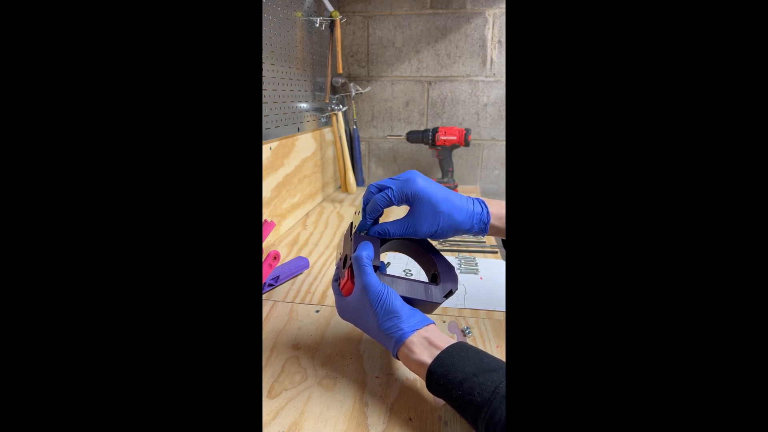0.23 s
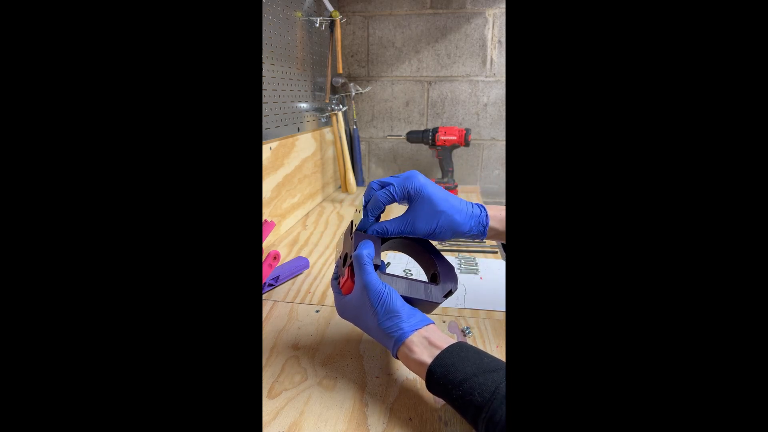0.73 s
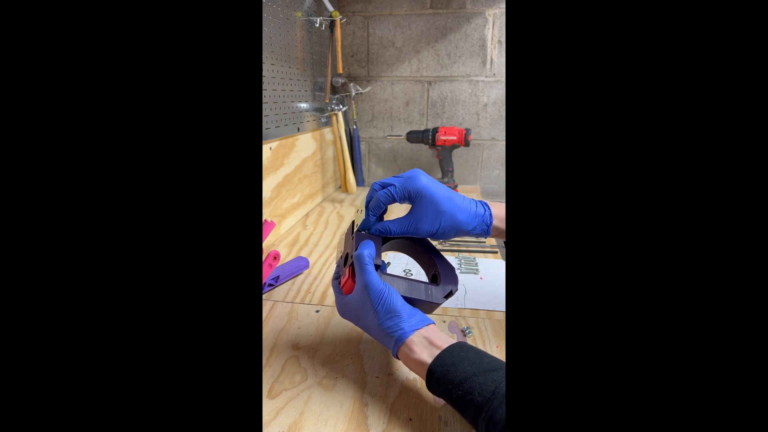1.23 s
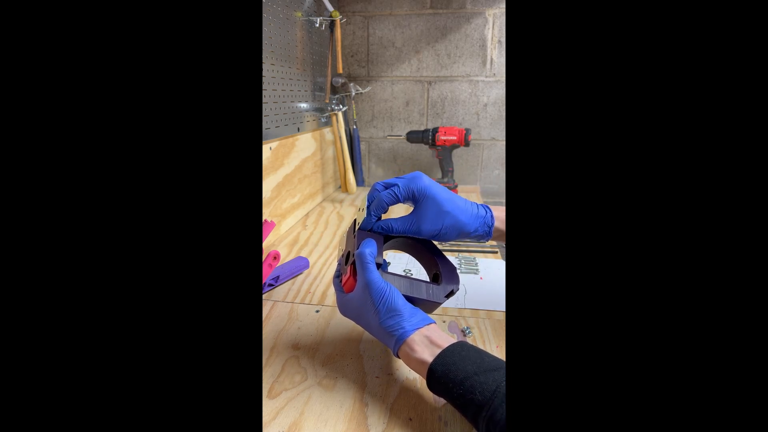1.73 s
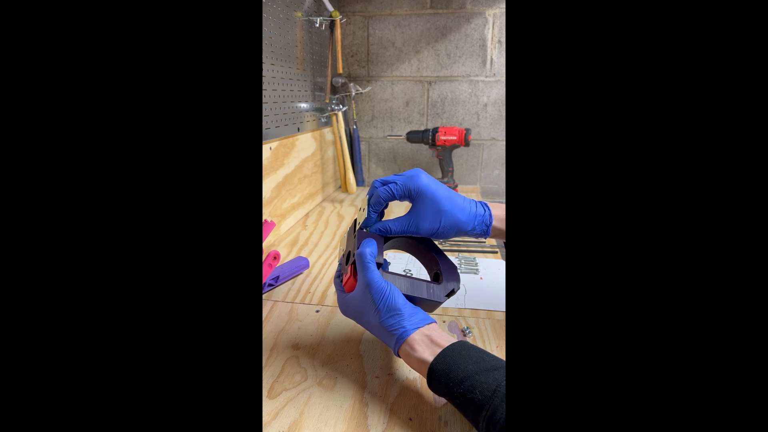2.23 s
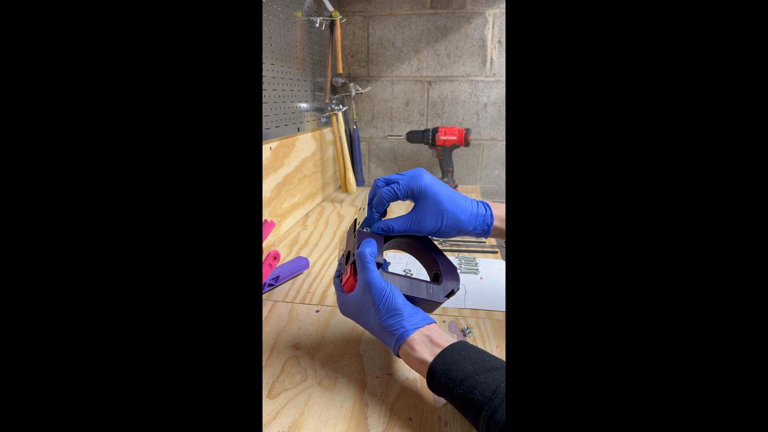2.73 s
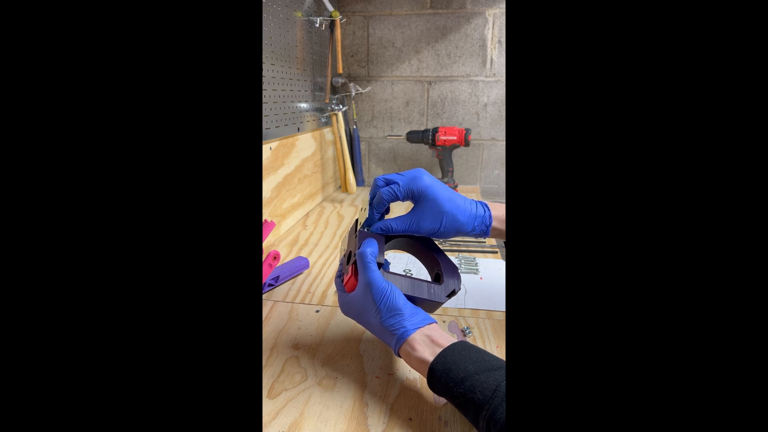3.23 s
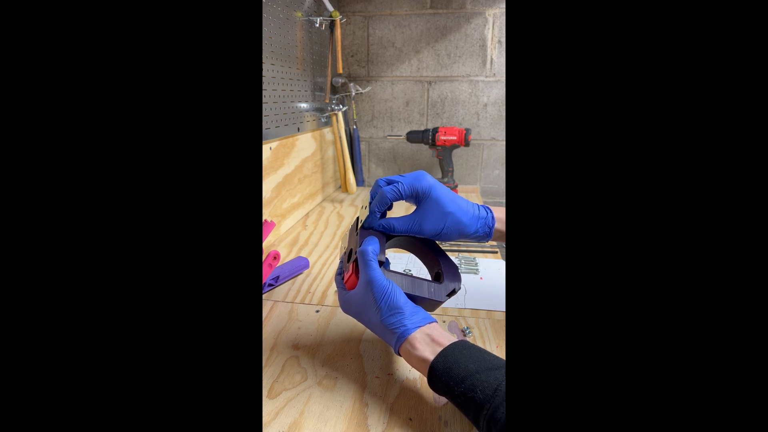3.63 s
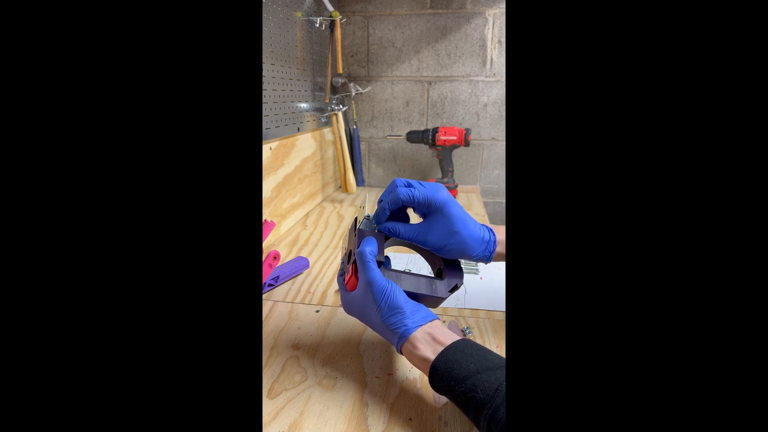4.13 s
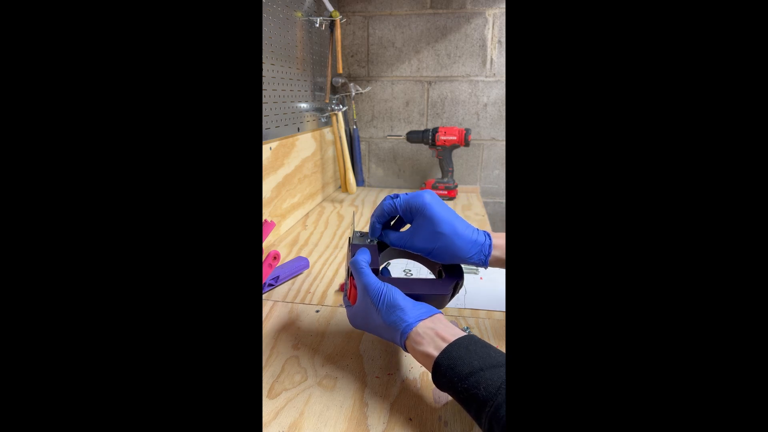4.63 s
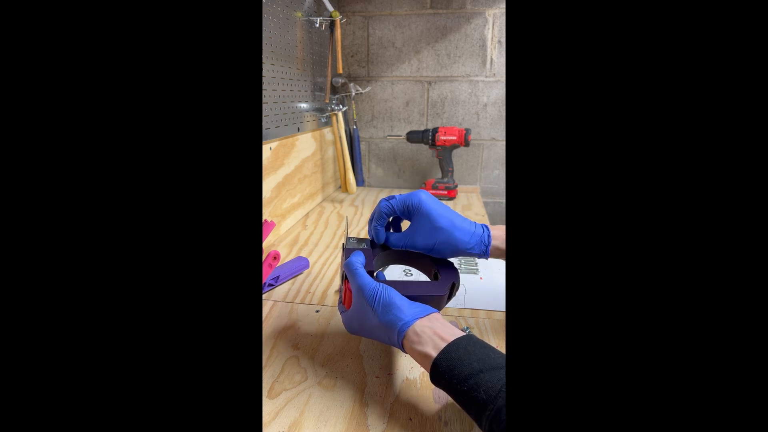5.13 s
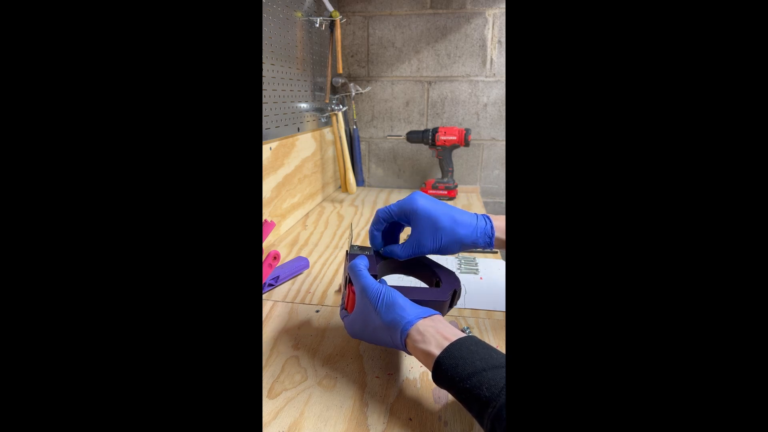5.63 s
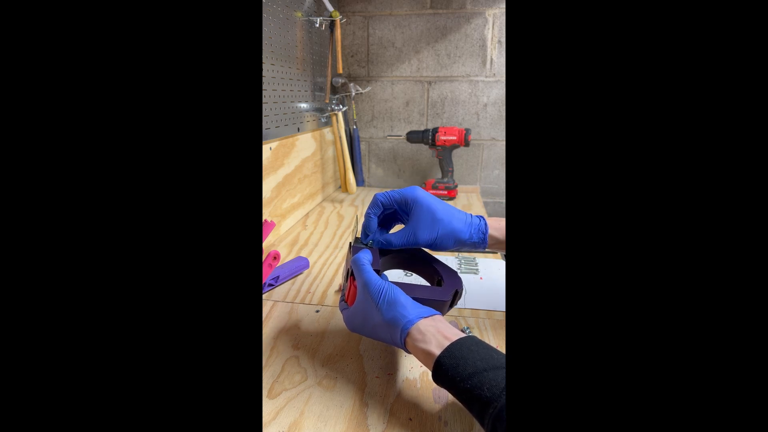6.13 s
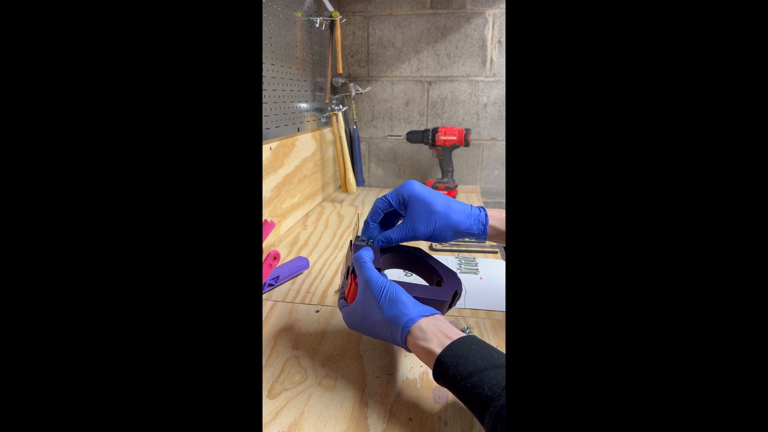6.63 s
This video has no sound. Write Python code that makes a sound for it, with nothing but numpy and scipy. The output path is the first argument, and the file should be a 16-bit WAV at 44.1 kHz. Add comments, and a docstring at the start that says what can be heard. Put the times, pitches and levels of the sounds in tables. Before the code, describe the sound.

Small steel nuts tick, scrape and clink as gloved fingers thread them onto a bracket's bolts, over a steady workshop fan hum.

```python
"""Over the steady hum and whine of a workshop fan, small steel nuts tick onto the bolts of a bracket.
Gloved fingers turn them in short strokes: they catch in the thread, grind and now and then clink hard,
each touch a burst of tiny impacts that rings the steel while the fingers damp it.
The rubber gloves stick and slip, which gives a rub, a rasp and one faint squeak.
The wooden workbench and the room add short echoes."""
import sys
import numpy as np
from scipy import signal
from scipy.fft import rfft, irfft
from scipy.io import wavfile

SR = 44100
rng = np.random.default_rng(int(sys.argv[2]) if len(sys.argv) > 2 else 0)


def unload_wav(signal):
    """Save mono or channel-first audio to the path in sys.argv[1] as 16-bit WAV at rate SR, clipped to [-1, 1]."""
    wavfile.write(
        sys.argv[1],
        SR,
        np.round(np.clip(np.atleast_2d(signal).T, -1, 1) * 32767).astype(np.int16),
    )


N = 303095
TIME = np.arange(N) / SR
HZ = np.fft.rfftfreq(N, 1 / SR)
SIDES = np.array([[1], [-1]])   # left, right

# a nut catches in the thread and drops free; body and edge lift its low and high register:
# (time [s], relative level [dB], body [dB], edge [dB], favoured pitch [Hz])
CATCHES = [(0.2236, -36, -6.5, -4, 9550), (0.23, -42, -3, 4, 7200), (0.2864, -45.5, -3.5, -4, 6500),
           (0.469, -45.5, -5, -9, 7100), (0.525, -52, -8, 7, 6340), (0.569, -41.5, 2.5, -21, 2200),
           (0.7874, -41, -5, -4, 7300), (0.9437, -40, -2.5, -12, 7150), (1.0297, -59.5, 9, 3, 6000),
           (1.168, -31, -11.5, -0.5, 6600), (1.22, -48, -3, -1, 7100), (1.3205, -43, -7, -8, 7500),
           (1.3437, -39.5, 3.5, -1, 7100), (1.5265, -55, 4, 1, 8300), (1.7332, -50.5, 1, -9, 7400),
           (1.78, -53.5, -12, -1, 7540), (2.387, -52, 5, -1, 7700), (2.4263, -26, -6.5, -7, 1920),
           (2.434, -33, -29, -17, 7160), (2.622, -42, -18, -6, 7100), (2.8988, -28.5, -6, -8, 2520),
           (3.1912, -42, 1, -8, 6900), (3.357, -37, 3, -4, 6850), (3.3611, -38, 0.5, 4, 14100),
           (3.717, -43.5, 6.5, -7, 7860), (3.78, -52, -7, -5, 7000), (3.909, -39, 5.5, -6, 5640),
           (3.9205, -50, 3, -5, 8300), (3.95, -43, 4, -7, 4260), (4.0411, -44, -10, -13, 8300),
           (4.1755, -47.5, -13, -6, 7800), (4.1868, -50, 8, -6, 4300), (4.2057, -52, 2, -7, 4850),
           (4.2401, -50, 5, -9, 4300), (4.2554, -49, -11, -2, 8300), (4.298, -59, 0, -7, 4800),
           (4.359, -50, -10, -16, 8400), (4.368, -46.5, -7, -12, 8350), (4.4048, -45, -8, -2, 8350),
           (4.4895, -59, 0, -1, 9100), (4.5773, -56.5, 5.5, 4, 9600), (5.1062, -43.5, 3, 0, 7320),
           (5.4136, -62, 18, -4, 2200), (5.714, -59.5, 5, 5, 8300), (6.009, -56.5, 15, 7, 3450),
           (6.184, -36, -4.5, 1.5, 7550), (6.192, -47, -10, 7, 12900), (6.2175, -50, -9, -9, 7940),
           (6.8377, -51, -16, -10, 6700)]
# loose steel parts knock together, with a relative level for each register:
# (time [s], low [dB], middle [dB], high [dB], chatter [s], favoured pitch [Hz])
KNOCKS = [(3.4802, -37.5, -20.5, -21, 0.0012, 8350), (3.4865, -30.5, -23, -22, 0.0051, 8350),
          (3.4962, -41.5, -20.5, -24, 0.0012, 7000), (3.4985, -43, -21, -24, 0.0033, 12350),
          (3.5065, -47, -33, -33, 0.002, 12350), (4.6939, -34, -25.5, -20.5, 0.0016, 12350),
          (4.7168, -33, -23.5, -20, 0.0015, 12350), (4.7475, -36.5, -25.5, -17.5, 0.00096, 12350),
          (4.7505, -38.5, -34.5, -17.5, 0.0014, 13960), (4.7674, -46.5, -47.5, -37, 0.00091, 13960),
          (5.1317, -45, -30, -29, 0.0022, 7800), (5.1484, -54, -29.5, -42, 0.0018, 7900)]
# dry stretches of thread: (time [s], low [dB], middle [dB], high [dB], length [s], favoured pitch [Hz])
DRY_SPOTS = [(1.53, -53.5, -56, -49, 0.0095, 8300), (2.054, -65, -56, -71, 0.0091, 7700),
             (2.245, -58, -57, -73, 0.0091, 7200), (3.276, -51.5, -54, -67, 0.014, 4360),
             (3.341, -45, -57, -53, 0.0085, 4350), (3.467, -49, -43, -43, 0.012, 7800),
             (3.623, -56, -61, -68, 0.0052, 4800), (3.951, -49, -47, -54, 0.014, 4520),
             (3.983, -55, -52, -58, 0.008, 7800), (4.036, -51, -46.5, -59, 0.014, 8300),
             (4.181, -46.5, -56, -57, 0.0066, 4260), (4.213, -53, -55, -60, 0.0059, 4850),
             (4.22, -48, -59, -62, 0.0088, 4300), (4.233, -49.5, -52, -57, 0.0091, 4400),
             (4.363, -59, -55, -65, 0.0114, 8350), (4.381, -53, -54, -62, 0.0055, 4850),
             (4.409, -55, -49, -53, 0.017, 8400), (5.359, -66, -61, -61, 0.012, 8300),
             (6.005, -48, -57, -54, 0.007, 4750)]
# the ring of bracket, bolt and nut: (pitch [Hz], undamped width [Hz], relative level [dB])
STEEL_MODES = [(2193, 20, -2), (2890, 1200, -3.5), (3495, 210, -1), (4254, 260, 0.5), (4800, 95, -4),
               (5250, 340, 1), (6430, 82, 0), (7140, 120, 3), (7800, 240, 2), (8350, 110, 0.5),
               (9070, 110, 2), (9700, 210, -2.5), (11200, 560, -4.5), (12510, 41, -0.5), (12900, 70, -4.5),
               (13850, 110, -1), (15530, 130, -0.5)]
# fingertip strokes on the nut: (centre time [s], half length [s], pressure [dB], brightness [dB])
STROKES = [(0.254, 0.029, -59, 8), (0.547, 0.041, -53.5, 12), (0.652, 0.014, -55, 8), (0.97, 0.061, -67, 8),
           (1.284, 0.12, -63.5, -6), (1.525, 0.03, -52.5, 8), (1.802, 0.026, -62, 8),
           (1.928, 0.025, -65, -4), (2.063, 0.031, -61, -3), (2.224, 0.038, -64.5, 13),
           (2.466, 0.044, -49.5, 8), (2.639, 0.036, -56, -4), (2.75, 0.02, -55, -2),
           (2.96, 0.047, -56.5, 4), (3.182, 0.0084, -53, -7), (3.265, 0.013, -63, -12),
           (3.403, 0.085, -51.5, 1.5), (3.61, 0.14, -62.5, 2.5), (3.956, 0.034, -48, 7),
           (4.057, 0.03, -54, 10), (4.22, 0.085, -60.5, 12), (4.414, 0.05, -52, 10),
           (4.657, 0.027, -54, 3.5), (5.055, 0.023, -49, 8), (5.118, 0.061, -46, -1),
           (5.398, 0.034, -59, 17), (5.576, 0.019, -58.5, 7), (5.684, 0.077, -58, 0.5),
           (5.952, 0.11, -66.5, -2), (6.196, 0.04, -58, -3), (6.362, 0.028, -61.5, 8),
           (6.658, 0.024, -60, 4.5), (6.723, 0.03, -66, 7)]
# the hand slides on the bracket: (centre time [s], half length [s], low rustle [dB], dull rub [dB])
GRIP_SHIFTS = [(4.137, 0.12, -51, -60), (4.845, 0.17, -56, -52), (5.676, 0.29, -52, -65.5),
               (6.696, 0.072, -76.5, -67.5), (6.858, 0.061, -54, -57)]
# the dull and the bright side of glove friction: (frequency [Hz], relative level [dB])
RUB_SPECTRUM = [(1500, -1.5), (2150, 15), (2900, 3), (3500, 7), (4400, 9.5), (5400, 5.5), (7000, -5),
                (10000, -7)]
RASP_SPECTRUM = [(3500, -7), (5800, -3), (8200, 1), (10500, -1), (12800, -0.5), (14200, -6), (15500, -18),
                 (16500, -40.5)]
# the path of a glove's squeak: (time [s], pitch [Hz], level [dB])
SQUEAK_PATH = [(5.75, 4700, -85), (5.79, 4830, -65), (5.83, 5020, -70), (5.87, 4800, -65),
               (5.905, 4750, -80), (5.95, 4800, -63), (6.0, 4620, -76)]
# the fan's rush of air: (frequency [Hz], relative level [dB])
AIR_SPECTRUM = [(170, -8.5), (270, -12.5), (350, -8), (520, -11.5), (740, -9), (950, 2), (1150, 0.5),
                (1560, -5.5), (1820, -20), (2200, -18.5), (3200, -32.5), (5000, -35.5), (13000, -49.5),
                (16000, -70)]
# how alike that rush is on both sides: (frequency [Hz], correlation [-1 to 1])
AIR_LIKENESS = [(100, 0.82), (200, 0.6), (320, 0.58), (550, 0.13), (750, 0.73), (950, 0.71), (1700, 1),
                (2300, 0.12), (4000, 0.15), (6000, 1), (16000, 0.7)]
# low room modes that the fan stirs: (pitch [Hz], width [Hz], level [dB])
ROOM_MODES = [(55.4, 13, -50), (76.9, 7.9, -42), (107, 5.9, -45), (118.4, 8.2, -57.5), (135.9, 1.8, -50.5),
              (150.8, 9.1, -56.5), (225, 18, -62.5)]
# motor hum and fan whine: (pitch [Hz], level [dB], left minus right [dB], left lead [s], waver [dB])
FAN_TONES = [(59.6, -37.5, 0, 0, 1.87), (120.4, -44.5, 2.5, 0, 0.7), (600, -64.5, 6.5, -.00035, 4.5),
             (821, -43, -10.5, -.000495, 0.7), (838, -59.5, 0.5, -.0004, -1)]
# how far the left side is ahead of the right: (frequency [Hz], phase lead [rad])
LEFT_LEAD = [(0, 0), (860, -1), (1400, -0.5), (1980, 0.3), (2750, 2.5), (3800, 1.97), (4950, 1.57),
             (6000, 3), (7800, 6.5), (12000, 11.5), (13000, 13), (15400, 16.5)]


def ticks(faint_per_stroke=2, chatter_s=0.0021):
    """The nut catches and drops free: clear ticks, plus faint ones that follow each stroke's pressure."""
    rows = [(s, db + body, db, db + edge, chatter_s, hz) for s, db, body, edge, hz in CATCHES]
    for centre, half, pressure_db, _ in STROKES:
        for moment, force, place in rng.standard_normal((faint_per_stroke, 3)):
            s = centre + half * np.tanh(moment)
            db = pressure_db - 5.5 + 5.5 * force
            favoured_hz = 7800 + 1000 * place
            rows.append((s, db + 0.5, db, db - 7.5, chatter_s, favoured_hz))
    return from_db(-2) * contacts(rows, damping=0.021, crack_db=11, first_blow=2.6, detune=0.016)


def clinks():
    """Loose steel parts knock hard together and ring longer than a tick."""
    return from_db(-4) * contacts(KNOCKS, damping=0.011, crack_db=10.5, first_blow=3.8, detune=0)


def contacts(rows, damping, crack_db, first_blow, detune, size=4096):
    """Steel on steel: a first blow and a dying burst of micro-impacts crack and set the modes ringing."""
    t, out = np.arange(size) / SR, np.zeros(N + size)
    for s, *levels_db, chatter_s, favoured_hz in rows:
        tuning = np.exp(detune * rng.standard_normal())   # the modes shift as the nut moves on the bolt
        impacts = crackle(9000, size) * np.exp(-(t / (2 * chatter_s)) ** 2)
        impacts[0] += first_blow
        sound = from_db(crack_db) * impacts
        for hz, width, db in STEEL_MODES:
            gain = from_db(db + contact_lift(hz, favoured_hz) + 2 * rng.standard_normal())
            held_width = width + damping * hz   # the fingers cut the ring short
            sound += gain * rng.choice([-1, 1]) * resonate(impacts, hz * tuning, held_width)
        at = round(s * SR)
        out[at:at + size] += balance_registers(sound, levels_db, attack_s=0.008)
    return out[:N]


def scrapes(grains_per_s=520, finger_damping_hz=160, size=2048):
    """A dry thread grinds: a short swell of uneven grains rings the pinched steel."""
    t, out = np.arange(size) / SR, np.zeros(N + size)
    for s, *levels_db, length, favoured_hz in DRY_SPOTS:
        swell = (t / length) ** 0.5 * np.exp(-(t / length) ** 2)
        grains = crackle(grains_per_s, size) * swell
        sound = np.zeros(size)
        for hz, width, db in STEEL_MODES:
            gain = from_db(db + contact_lift(hz, favoured_hz))
            sound += gain * rng.choice([-1, 1]) * resonate(grains, hz, width + finger_damping_hz)
        at = round(s * SR)
        out[at:at + size] += balance_registers(sound, levels_db, attack_s=length)
    return out[:N]


def resonate(x, hz, width):
    """One ringing mode; it takes the same energy from a click whatever its width."""
    r = np.exp(-np.pi * width / SR)
    feedback = [1, -2 * r * np.cos(2 * np.pi * hz / SR), r * r]
    return signal.lfilter(np.sqrt(1 - r * r) * np.array([1, 0, -1]), feedback, x)


def contact_lift(hz, favoured_hz, lift_db=11, reach_hz=400):
    """The point of contact brings out the modes near one pitch: their lift in dB."""
    return lift_db * np.exp(-((hz - favoured_hz) / reach_hz) ** 2)


def balance_registers(sound, levels_db, attack_s, edges_hz=(1400, 5500, 10500, 17500)):
    """How firm and how sharp a touch is sets the loudness of its low, middle and high register."""
    out, attack = 0, np.arange(len(sound)) / SR < attack_s
    for low, high, db in zip(edges_hz, edges_hz[1:], levels_db):
        register = band(band(sound, low, high), low, high)
        power = max(np.mean(register[attack] ** 2), np.mean(register ** 2))
        out += from_db(db) * register / np.sqrt(power + 1e-20)
    return out


def gloves(rub_db=-2.5, rasp_db=-5.5):
    """Rubber drags on steel: each stroke has a dull rub and a bright rasp, a sliding hand only the rub."""
    dull = [(s, half, db + rub_db - bright / 2) for s, half, db, bright in STROKES]
    dull += [(s, half, db) for s, half, _, db in GRIP_SHIFTS]
    sharp = [(s, half, db + rasp_db + bright / 2) for s, half, db, bright in STROKES]
    rub = swells(dull) * friction(RUB_SPECTRUM, slips_per_s=900, clump_db=3, grit_db=-5.5)
    rasp = swells(sharp) * friction(RASP_SPECTRUM, slips_per_s=2400, clump_db=3.5, grit_db=-9.5)
    return rub + rasp


def friction(spectrum, slips_per_s, clump_db, grit_db):
    """Rubber sticks and slips: dense tiny snaps in clumps, with sparser scratches of the thread."""
    slips = crackle(slips_per_s) * from_db(clump_db * drift(65))
    scratches = crackle(per_s=150)
    texture = rms_one(slips) + from_db(grit_db) * rms_one(scratches)
    return coloured(texture, from_db(curve(spectrum)))


def squeak(waver_hz=24.8, roughness_hz=80):
    """A slipping fingertip sings one thin, wavering line."""
    s, hz, db = np.transpose(SQUEAK_PATH)
    pitch = np.interp(TIME, s, hz) + waver_hz * drift(14.3) + roughness_hz * drift(380)
    gain = np.interp(TIME, s, from_db(db), left=0, right=0) * from_db(2.8 * drift(30))
    return np.sqrt(2) * gain * np.sin(2 * np.pi * np.cumsum(pitch) / SR)


def grip():
    """The hand moves on the bracket with a soft, low rustle."""
    rustle = rms_one(band(rng.standard_normal((2, N)), 210, 460))
    return swells([(s, half, db) for s, half, db, _ in GRIP_SHIFTS]) * rustle


def reflections(x, t60_s, build_s, width, size=16384):
    """Nearby surfaces return a dying cloud of echoes, widest in the midrange."""
    t = np.arange(size) / SR
    cloud = rng.standard_normal((2, size))
    top = irfft(rfft(cloud) * (np.fft.rfftfreq(size, 1 / SR) > 10000), size)
    fade = from_db(-60 * t / t60_s)
    onset = 1 - np.exp(-(t / build_s) ** 2)
    mid, side = ((cloud - top) * fade + top * fade ** 0.94) * onset   # the top lingers slightly
    side = 0.7 * band(side, 500, 4500) + 0.3 * side
    echoes = (mid + width * side * SIDES) / np.sqrt(np.sum(mid ** 2))
    return signal.fftconvolve(x[None], echoes, axes=1)[:, :N]


def fan():
    """The ventilation fan lays the bed: rushing air, rumble in the room modes, motor hum, thin whine."""
    alike = np.clip(curve(AIR_LIKENESS), -1, 1)
    mid, side = rfft(rng.standard_normal((2, N)))
    air = irfft(np.sqrt(1 + alike) * mid + np.sqrt(1 - alike) * side * SIDES, N)
    out = from_db(-41.5) * coloured(phase_spread(air), from_db(curve(AIR_SPECTRUM)))
    for hz, width, db in ROOM_MODES:
        out += from_db(db) * coloured(rng.standard_normal(N), 1 / (1 + ((HZ - hz) / width) ** 2))
    for hz, db, pan_db, lead_s, waver_db in FAN_TONES:
        phase = 2 * np.pi * (hz * (TIME + SIDES * lead_s / 2) + rng.random()) + 0.1 * drift(1.5)
        gain = from_db(db + SIDES * pan_db / 2 + waver_db * drift(7.8))
        out += np.sqrt(2) * gain * np.sin(phase)
    return out


def phase_spread(pair):
    """Each pitch reaches left and right with its own phase difference."""
    lead = np.interp(HZ, *np.transpose(LEFT_LEAD))
    return irfft(rfft(pair) * np.exp(0.5j * lead * SIDES), N)


def crackle(per_s, size=N):
    """Clicks at random moments and of random strength."""
    return rng.standard_normal(size) * (rng.random(size) < per_s / SR)


def swells(rows):
    """Bell-shaped envelopes, added in power: (centre time [s], half length [s], level [dB])."""
    powers = (from_db(db) ** 2 * np.exp(-np.minimum(((TIME - s) / half) ** 2, 100))
              for s, half, db in rows)
    return np.sqrt(sum(powers))


def drift(rate_hz):
    """A smooth random wobble at rms 1."""
    return coloured(rng.standard_normal(N), 1 / (1 + (HZ / rate_hz) ** 2))


def band(x, low_hz, high_hz):
    """A gentle band-pass."""
    return signal.sosfilt(signal.butter(2, [low_hz, high_hz], "band", fs=SR, output="sos"), x)


def coloured(x, gain):
    """Equalised by a gain per frequency, at rms 1."""
    return rms_one(irfft(rfft(x) * gain, N))


def curve(points):
    """A spectrum table read at every frequency, on a log axis."""
    hz, value = np.transpose(points)
    return np.interp(np.log(HZ + 1), np.log(hz), value)


def rms_one(x):
    """Scaled to rms 1."""
    return x / np.sqrt(np.mean(x ** 2) + 1e-20)


def from_db(db):
    """Decibels as a gain."""
    return 10 ** (np.asarray(db) / 20)


def scene():
    """Nuts and gloves up close, with echoes from bench and room, over the fan."""
    close = clinks() + ticks() + scrapes() + gloves() + squeak()
    bench = from_db(-8) * reflections(close, t60_s=0.06, build_s=0.002, width=1)
    # the walls swallow the highest treble
    dulled = signal.sosfilt(signal.butter(1, 10000, fs=SR, output="sos"), close)
    room = from_db(-6.5) * reflections(dulled, t60_s=0.16, build_s=0.0012, width=1.4)
    return phase_spread(close + bench + room) + grip() + fan()


def record(dry):
    """The deepest bass is rolled off and the top is cut steeply."""
    thinned = signal.sosfilt(signal.butter(2, 28, "high", fs=SR, output="sos"), dry)
    return signal.sosfilt(signal.ellip(10, 0.2, 80, 16050, fs=SR, output="sos"), thinned)


dry = scene()
out = record(dry)
unload_wav(out)
```